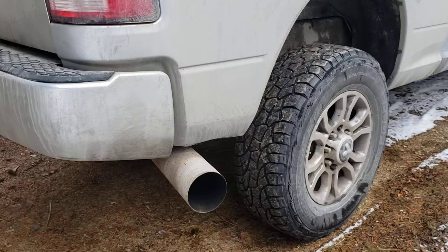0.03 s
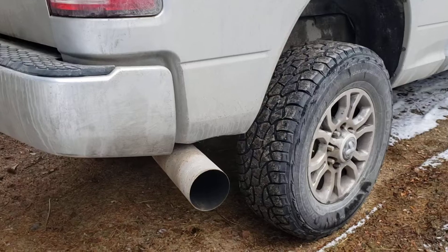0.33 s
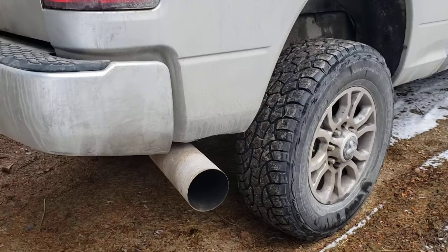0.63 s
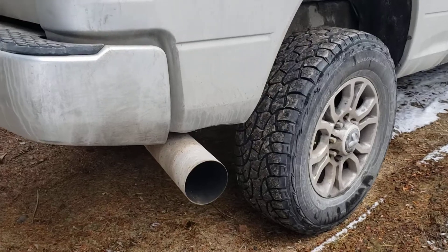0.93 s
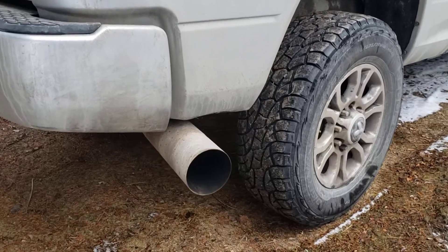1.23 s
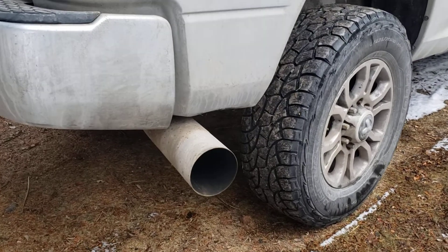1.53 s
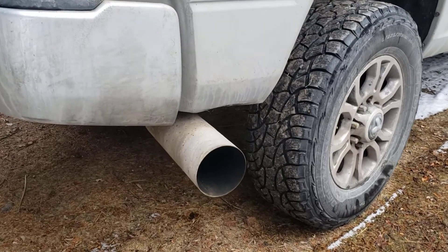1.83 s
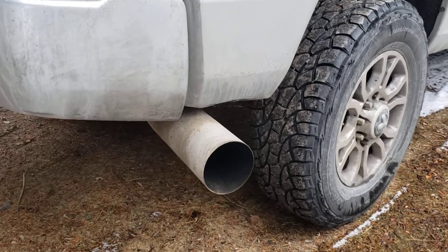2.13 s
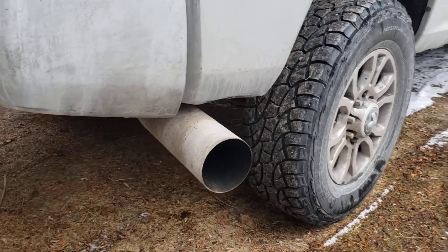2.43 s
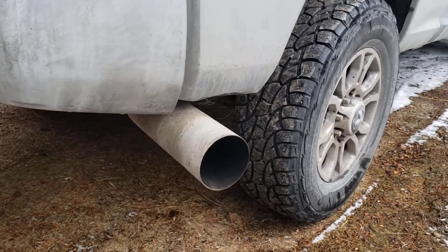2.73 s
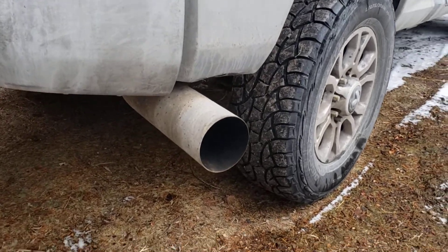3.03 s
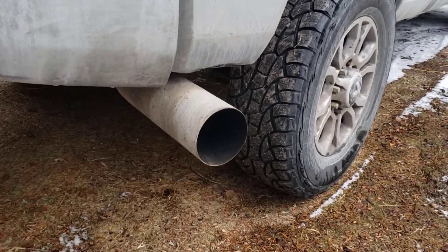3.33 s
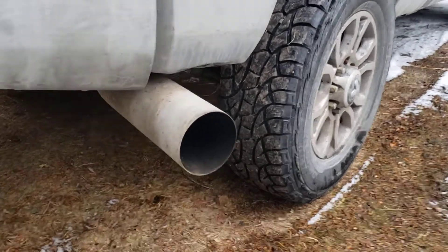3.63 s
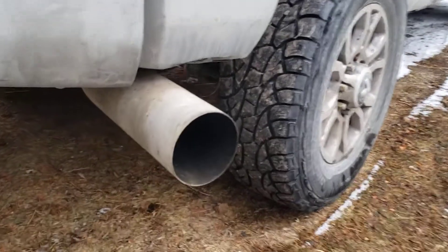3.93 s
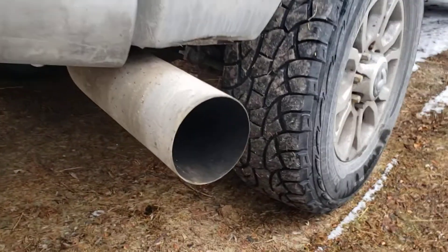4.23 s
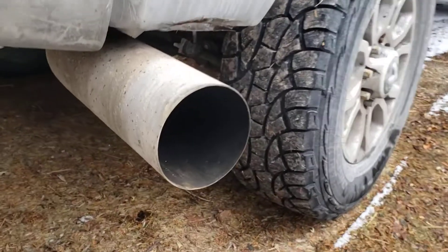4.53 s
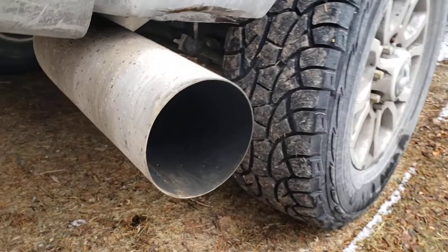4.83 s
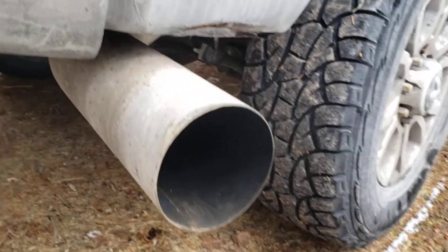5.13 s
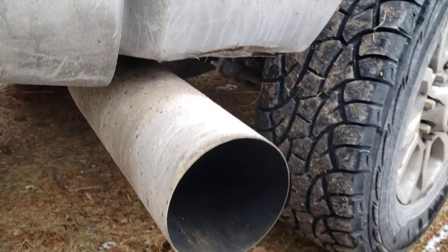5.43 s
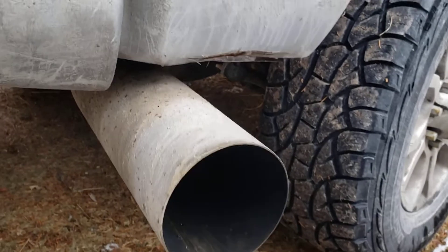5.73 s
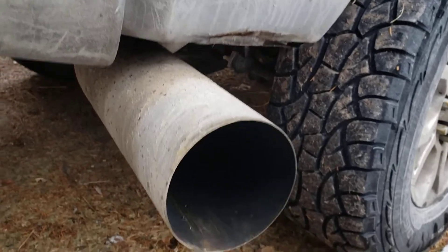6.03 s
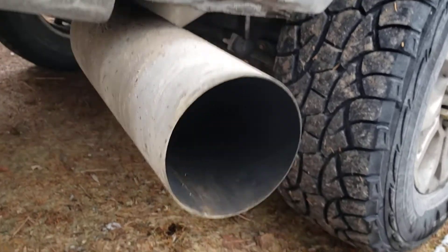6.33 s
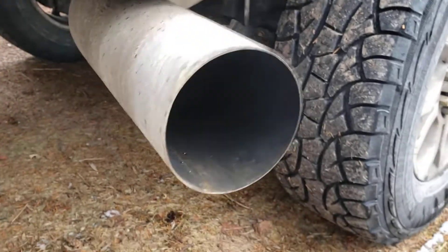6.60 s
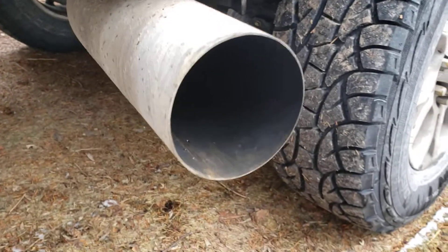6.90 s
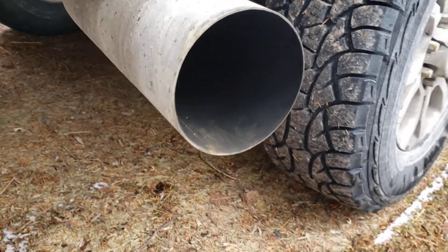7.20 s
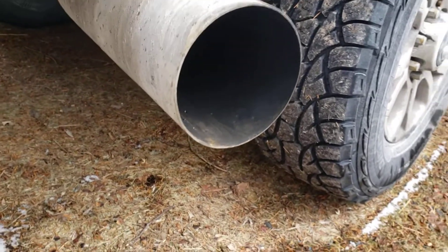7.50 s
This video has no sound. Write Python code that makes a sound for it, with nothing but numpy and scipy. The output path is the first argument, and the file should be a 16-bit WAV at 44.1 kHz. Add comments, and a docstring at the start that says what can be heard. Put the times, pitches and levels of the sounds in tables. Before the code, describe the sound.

A diesel pickup idles outdoors from the start, a deep, even throb of about thirteen puffs a second with light mechanical clatter. From about 1 to 5 seconds, soft footsteps scuff and grit pops as the microphone is carried toward the tailpipe, clearest around 2.5 and 3.6 seconds. The throb grows slightly fuller up close. At 5.4 seconds comes one sharp click, and at 5.5 the exhaust suddenly gushes with a hollow rush, small spurts and low thumps. At about 6.5 seconds the stream hits the microphone hard, the loudest moment, and drowns the idle with buffeting rumble and bright hiss, mostly on the left. From there it settles into a fast pulsing growl and fluttering hiss, with a few brief dips and a hollow howl that drops slightly in pitch near 7 seconds. It keeps blowing until the end, near 7.8 seconds.

```python
"""Walking up to a diesel tailpipe.

Outdoors, a pickup idles, throbbing out of a wide pipe as the microphone is carried up to it over
gritty ground. At close range there is one sharp click and the exhaust suddenly gushes; then the stream
hits the microphone, buffeting it, growling and hissing in fast pulses, mostly on the left."""
import sys
import numpy as np
from scipy import signal
from scipy.fft import rfft, irfft, next_fast_len
from scipy.io import wavfile
from scipy.ndimage import uniform_filter1d, map_coordinates

SR = 44100
rng = np.random.default_rng(int(sys.argv[2]) if len(sys.argv) > 2 else 0)


def dump(signal):
    """Clip the signal to [-1, 1] and save it as 16-bit WAV at the path in sys.argv[1]."""
    limited = np.clip(np.atleast_2d(signal).T, -1, 1)
    pcm = np.round(limited * 32767).astype(np.int16)
    wavfile.write(sys.argv[1], SR, pcm)


N = 342216
T = np.arange(N) / SR
OPEN_S, GUSH_START_S, PULSE_PEAK_S = .1, 5.527, 7.211

# the walk up to the pipe: t/s, throb level/dB, closeness/0-1
APPROACH = [(.1, -24, 0), (1.0, -25, 0.2), (2.2, -23, 0.28), (3.2, -22.5, 0.2), (4.3, -23.5, 0.6),
            (5.0, -25, 0.94), (5.6, -24.5, 0.96)]
# the microphone moves into the stream: t/s, hiss/dB, roar/dB, rumble/dB
STREAM_AT_MIC = [(5.6, -59, -36.5, -36.5), (6.32, -54, -34, -29.5), (6.43, -44.5, -31.5, -23),
                 (6.5, -29.5, -17.5, -17.5), (6.525, -23.5, -23, -21.5), (6.8, -23.5, -24.5, -27),
                 (6.92, -26.5, -32, -30.5), (7.15, -29.5, -36, -28.5), (7.28, -26, -27, -33),
                 (7.44, -31.5, -38.5, -46), (7.62, -26.5, -29, -37.5), (7.76, -31, -41, -46.5)]
# balance of sound arriving through open air: f/Hz, left minus right/dB
AIR_BALANCE = [(400, -0.5), (3300, -0.5), (5500, -0.5), (8300, 32.5), (12000, 3), (15000, 6.5)]
# likeness of left and right, in open air and in the stream: f/Hz, correlation
AIR_LIKENESS = [(150, 0), (400, 0.63), (950, 0), (2400, 0), (15000, 0.15)]
STREAM_LIKENESS = [(60, 0.97), (130, 0.9), (300, 0.77), (550, 0.93), (1000, 0.2), (2300, -0.061),
                   (5000, -0.29), (15000, 0.26)]


def throb(turns, first_s=.1097):
    """Each turn of the idling engine sends one puff ringing through the pipe."""
    pipe_colour = [(34, -45), (52, -0.5), (61, 3), (80, -5), (106, 3), (120, -2), (143, -20.5), (158, -8.5),
                   (185, -23), (206, -17.5), (285, -26), (340, -41.5), (500, -51.5), (900, -83)]  # one throb through the exhaust system: f/Hz, level/dB
    mouth_colour = [(60, 4), (105, 5), (160, 1), (220, 3), (310, -16.5), (370, 7), (520, 4.5)]  # change right at the pipe's mouth: f/Hz, gain/dB
    swamping = [(5.6, 1), (5.9, -2), (6.45, -5.5), (6.7, -20.5)]  # the stream drowns the slow beat: t/s, gain/dB
    train = puffs(turns, first_s, scatter_db=0.7) * (T > OPEN_S)
    far = signal.fftconvolve(train, ring(lambda hz: along(pipe_colour, hz)))[:N]
    near = signal.fftconvolve(far, ring(lambda hz: along(mouth_colour, hz)))[:N]
    approach_db, closeness = curves(APPROACH)
    level_db = approach_db + curves(swamping)[0] + 0.17 * wobble(2.7)
    return unit(far + closeness * (near - far)) * amp(level_db) * amp([[.25], [-.25]])


def jet(settled, flutter, lull_db, flutter_db=3, rise_s=.007):
    """The stream grazes the microphone and hisses: stray spurts at first, then a pulsing blast."""
    hiss_colour = [(880, -33), (1500, -12), (1560, -24), (1740, -49), (1880, -2), (2040, -6), (2450, 4.5),
                   (2990, -7.5), (3330, -6), (3710, -0.5), (5040, -4.5), (7470, -0.5), (8750, -3.5),
                   (15000, 2.5), (15800, -4)]  # gas across the microphone: f/Hz, density/dB
    balance = [(700, -12), (1700, 6), (2700, -3.5), (4000, 4), (5500, 11), (8000, 23), (12000, 5),
               (15500, 11.5)]  # where the hiss sits: f/Hz, left minus right/dB
    stray_spurts = [(5.564, -37, 0.02), (5.727, -37, .014), (5.908, -35.5, 0.018), (6.093, -46, 0.027),
                    (6.237, -44, 0.018)]  # gas brushing the microphone: t/s, level/dB, decay/s
    blast = amp(curves(STREAM_AT_MIC)[0] + flutter_db * settled * flutter - lull_db)
    spurts = sum(amp(db) * np.exp(-np.maximum((s - T) / rise_s, (T - s) / decay))
                 for s, db, decay in stray_spurts)
    return panned(rush(hiss_colour, STREAM_LIKENESS, patchy_db=0), balance) * (blast + spurts)


def buffeting(swing_db=4, drone_db=-26.5, low_cut_hz=42):
    """Eddies rumble on the microphone and blow the pipe's low resonances; slugs of gas thump it."""
    # deep and low-mid eddies on the microphone: f/Hz, density/dB
    rumble_colour = [(24, -50), (34, -20.5), (42, -0.5), (52, 6.5), (66, -4), (90, 2), (200, -50)]
    roar_colour = [(120, -12.5), (155, 2.5), (250, -7), (400, -7), (540, -17.5), (700, -16), (1500, -55.5)]
    # the pipe's main and upper resonances: f/Hz, width/Hz, level/dB
    main_modes = [(80.1, 22, 2.5), (113.4, 14, 1.5)]
    upper_modes = [(147.6, 22, 4), (180.9, 20, 1.5), (284.4, 24, 1.5), (310, 16, -1), (347.6, 20, -5),
                   (414, 40, -10.5)]
    slugs = [(5.695, -19, 487, 0.058), (5.731, -17, 147, 0.096), (5.919, -11.5, 102.8, 0.55),
             (6.193, -8, 83.5, 0.06), (6.47, -3, 61, 0.066), (6.472, -9.5, 388, 0.033),
             (6.51, -12, 485, 0.035)]  # gas striking the microphone: t/s, level/dB, f/Hz, t60/s
    _, roar_db, rumble_db = curves(STREAM_AT_MIC)
    rumble = amp(rumble_db + swing_db * wobble(14)) * rush(rumble_colour, STREAM_LIKENESS, patchy_db=.5)
    drone = resonances(main_modes, 1 + 0.019 * wobble(12))
    drone = unit(drone / np.sqrt(np.abs(signal.hilbert(drone)) + 0.17))  # losses cap its swing
    drone *= amp(drone_db) * np.interp(T, [5.6, 5.95], [.2, 1])
    eddies = amp(-3) * rush(roar_colour, STREAM_LIKENESS, patchy_db=3.5)
    body = amp(-5) * resonances(upper_modes, 1 + 0.01222 * wobble(12))
    roar = amp(roar_db + wobble(45)) * (eddies + body)
    thumps, t = np.zeros(N), np.arange(SR // 4) / SR
    for s, db, hz, t60 in slugs:
        add(thumps, s, -amp(db - 60 * t / t60) * np.sin(2 * np.pi * hz * t))
    low_cut = signal.cheby1(N=4, rp=1, Wn=low_cut_hz, btype="high", fs=SR, output="sos")
    thumps = signal.sosfilt(low_cut, thumps)
    return (rumble + drone + thumps) * amp([[.3], [-.3]]) + roar * amp([[.8], [-.8]])


def growl(beats, settled, level_db=-25, lead_s=0.0041):
    """Each fast pulse of the stream rings the pipe, merging into a pitched growl."""
    pulse_colour = [(25, -64), (42, -32.5), (77, -1.5), (98, -3), (116, 3), (145, -7), (185, -14),
                    (250, -17.5), (320, -19), (420, -23), (600, -41), (1200, -69)]  # one pulse in the pipe: f/Hz, level/dB
    train = puffs(beats, PULSE_PEAK_S - lead_s, scatter_db=1.8)
    sound = unit(signal.fftconvolve(train, ring(lambda hz: along(pulse_colour, hz)))[:N])
    return amp(level_db) * settled * sound * amp([[.4], [-.4]])


def gush(settled, flutter, lull_db, base_db=-35, surge_s=0.03, drift_share=.035):
    """Turbulent gas surges from the pipe; hollow bands drift about and fade as the stream settles."""
    gas_colour = [(160, -21.5), (290, -7), (386, -19), (500, -4.5), (660, -11.5), (810, -6.5), (1100, -8),
                  (1400, -13), (1640, -12), (2300, -13.5), (2950, -10.5), (3400, -19.5), (4430, -24.5),
                  (15800, -44)]  # turbulence at the mouth: f/Hz, density/dB
    hollow_bands = [(811, 60, -1.5), (1120, 90, 0), (1618, 70, -5), (2106, 130, -15)]  # resonances in the gush: f/Hz, width/Hz, level/dB
    balance = [(400, 1), (2000, 3.5), (3300, -1), (5500, 3.5), (8300, 36), (12000, 15), (15000, -1.5)]  # where the gush sits: f/Hz, left minus right/dB
    broad = rush(gas_colour, STREAM_LIKENESS, patchy_db=3.5)
    pitch = 1 + (1 - settled) * drift_share * wobble(24) + .012 * wobble(19)
    hollow = np.array([resonances(hollow_bands, pitch) for _ in range(2)]) * amp(-1 - 6 * settled)
    surge_db = 5.5 * np.exp(-((T - GUSH_START_S - surge_s) / surge_s) ** 2)
    level_db = base_db + surge_db + settled * (0.5 * flutter - 2.5) - 0.54 * lull_db
    return panned(broad + hollow, balance) * amp(level_db)


def lulls(snap_s=.008):
    """Loss of the stream in dB: it sags away gradually, then snaps back."""
    sags = [(5.9, 0.09, 8.5), (6.062, 0.067, 6), (6.195, .065, 9), (6.692, 0.051, 28.5), (6.891, 0.096, 12),
            (7.025, 0.043, 16.5), (7.206, 0.04, 9.5)]  # dips in the stream: return t/s, length/s, nominal depth/dB
    shape = [0.00045, 0.92, 0.67, 0.0055]
    return sum(db * np.interp(T, [s - length, s - length / 3, s - snap_s / 2, s + snap_s / 2], shape)
               for s, length, db in sags)


def singing(lines_db=-41, howl_width_hz=6.73):
    """The stream keeps narrow pipe resonances sounding, and a howl at the rim that drops in pitch."""
    narrow_modes = [(219.4, 9, 7), (274.4, 7.1, 2), (808, 22, -0.5), (1623, 16, -11)]  # pipe resonances: f/Hz, width/Hz, level/dB
    firmness = [(5.8, 0.31), (6.45, 0.66), (6.6, 0.62), (7.76, 1.8)]  # how firmly they sound: t/s, gain
    rim_howl = [(6.45, 342, -68), (6.58, 343, -31), (6.8, 345, -39), (6.95, 315, -37.5), (7.15, 315, -49),
                (7.3, 316, -35.5), (7.76, 318, -39)]  # gas across the rim: t/s, f/Hz, level/dB
    lines = amp(lines_db) * curves(firmness)[0] * resonances(narrow_modes, 1 + 0.00426 * wobble(7.3))
    howl_hz, howl_db = curves(rim_howl)
    phase = 2 * np.pi * np.cumsum(howl_hz + howl_width_hz / 2 * wobble(20)) / SR
    return lines + amp(howl_db + 2.3 * wobble(12)) * unit(np.sin(phase))


def clatter(turns, swell_db=2.5, lag_turns=0.26):
    """Mechanical noise and gas hiss from under the truck swell shortly after every puff."""
    levels = [(.5, -54.5), (2.0, -53), (3.0, -50.5), (4.1, -49.5), (5.2, -53)]  # clatter along the walk: t/s, level/dB
    engine_colour = [(250, -6), (380, -6.5), (480, -18), (620, -16.5), (820, -17), (1020, -24.5),
                     (1450, -29.5), (1810, -22), (2300, -33.5), (3100, -32.5), (4200, -34.5), (5400, -40),
                     (7500, -40), (9000, -41.5), (15800, -36)]  # engine noise: f/Hz, density/dB
    bodywork = [(300, -4), (480, 6), (700, -3), (2000, 2.5), (3000, -2), (4200, 2), (12000, 1)]  # its shading with the microphone low by the pipe: f/Hz, gain/dB
    swell = np.cos(2 * np.pi * (turns - np.interp(.107, T, turns) - lag_turns))
    level_db = curves(levels)[0] + swell_db * swell + wobble(150) + 1.4 * wobble(6.6)
    sound = panned(rush(engine_colour, AIR_LIKENESS, patchy_db=3), AIR_BALANCE) * amp(level_db)
    shaded = filtered(sound, lambda hz: amp(along(bodywork, hz)))
    closeness = curves(APPROACH)[1]
    return sound + closeness ** 2 * (shaded - sound)


def grit_and_click():
    """Grit pops underfoot on the way in; apart from it, one sharp click comes just before the gush."""
    # the grit, then the click in the last row: t/s, level/dB, relative knock/dB, treble/dB, tail/dB
    onsets = [(1.338, -41, -7.5, -20, -10), (1.398, -38, 4, -43, -36), (1.561, -36, -8.5, -52, -14),
              (1.645, -54, -11, -20.5, -11), (1.821, -38, -13.5, -26, -17), (2.426, -27.5, -12, -7.5, 1),
              (2.46, -28.5, -1.5, -18, -16.5), (2.496, -34.5, -6, -6.5, -14),
              (3.266, -44, -19, -34.5, -14.5), (3.504, -33.5, -6, -40, -14.5),
              (3.558, -36.5, -3.5, -34.5, -19.5), (3.583, -25.5, -16.5, -14.5, -21),
              (3.643, -37.5, -18, -37, -10), (3.756, -46.5, -16, -31.5, -10), (3.965, -30.5, -22, -30, -8),
              (4.028, -39.5, -2.5, -30, -26), (4.047, -40.5, -10.5, -42, -25.5),
              (4.165, -30, -10.5, -40.5, -18), (4.199, -41, -13, -24, -13), (4.568, -34, -11, -35, -25.5),
              (4.595, -40.5, -14, -26, -17), (4.76, -46.5, -18, -33, -29), (5.421, -22, -12.5, -7, -35.5)]
    grit, click = onsets[:-1], onsets[-1:]
    return snaps(grit) + snaps(click)


def snaps(rows, tail_t60=0.024, gain_db=6.5):
    """One snap per row, with a dull knock and a short noisy tail."""
    # the snap and its knock: f/Hz, level/dB
    snap_colour = [(200, -26), (1050, 2.5), (1700, -6.5), (4000, -17), (15000, -46)]
    knock_colour = [(150, -8.5), (400, 22), (750, 15.5), (1500, -12), (5000, -41.5)]
    track, t = np.zeros((2, N)), np.arange(2048) / SR
    for s, db, knock_db, treble_db, tail_db in rows:
        def colour_db(hz):
            knock = amp(knock_db + along(knock_colour, hz))
            treble = amp(treble_db - 6) * hz / (hz + 1500)
            return 20 * np.log10(amp(along(snap_colour, hz)) + knock + treble)
        burst = amp(tail_db - 60 * t / tail_t60) * rng.standard_normal((2, len(t)))
        burst[:, 0] = 1  # the sharp onset
        snap = signal.fftconvolve(ring(colour_db, size=2048)[None], burst, axes=1)
        for channel, sound in zip(track, snap / np.abs(snap).max()):
            add(channel, s + 0.0011, amp(db + gain_db) * sound)
    return track


def scuffs():
    """Soles scrape the ground below the microphone and drag hissing sand."""
    steps = [(0.804, 0.054, -65, 3), (1.504, .008, -73, 10.5), (1.625, 0.036, -71, -3),
             (2.326, 0.044, -48.5, -14), (2.445, 0.02, -41, -12.5), (2.507, 0.028, -46, -13.5),
             (2.588, 0.088, -60.5, -19), (3.161, 0.091, -61, -12.5), (3.523, 0.01, -54.5, -17.5),
             (3.983, 0.026, -57.5, -16), (4.172, 0.008, -44, -16), (4.57, 0.049, -54, -12)]  # sole strokes: t/s, half-width/s, level/dB, relative sand/dB
    # the ground and the sand under a sole: f/Hz, density/dB
    ground_colour = [(250, -30.5), (420, -9), (650, -4.5), (800, 3.5), (930, -2.5), (1300, -2), (1900, -8),
                     (2800, -11), (4000, -26), (6000, -39), (12000, -54)]
    sand_colour = [(1500, -19.5), (3800, 1), (7000, -2), (15000, -5)]
    scrape_gain, sand_gain = np.zeros((2, N))
    for s, width, db, sand_db in steps:
        stroke = amp(db) * np.exp(-.5 * ((T - s) / width) ** 2)
        scrape_gain += stroke
        sand_gain += stroke * amp(sand_db)
    scrape = scrape_gain * rush(ground_colour, AIR_LIKENESS, patchy_db=2.5)
    sand = sand_gain * rush(sand_colour, AIR_LIKENESS, patchy_db=3)
    return (scrape + sand) * unit(amp(2.8 * wobble(250)))


def grains(count=30, from_s=.6, to_s=5.5, peak_db=-55, spread_db=0.5):
    """Single grains shift underfoot, ticking at random between the louder pops."""
    tick_colour = [(300, -15), (900, 0), (3000, -5.5), (7000, -9.5), (15000, -13.5)]  # one grain: f/Hz, level/dB
    tick = ring(lambda hz: along(tick_colour, hz), size=1024)
    track = np.zeros(N)
    for s, chance in zip(rng.uniform(from_s, to_s, count), rng.standard_normal(count)):
        add(track, s, amp(peak_db + spread_db * chance) * tick / np.abs(tick).max())
    return track


def hum():
    """A faint hum swells briefly in the background."""
    swell = (4.27, .13, 790, -60)  # one tone: t/s, half-width/s, f/Hz, level/dB
    s, width, hz, db = swell
    return amp(db) * np.exp(-.5 * ((T - s) / width) ** 2) * np.sin(2 * np.pi * hz * T)


def puffs(turns, anchor_s, scatter_db):
    """One impulse per turn, in step with anchor_s, each a little different in strength."""
    phase = np.interp(anchor_s, T, turns) % 1
    starts = np.interp(np.arange(phase, turns[-1], 1), turns, T)
    train = np.zeros(N)
    for s, chance in zip(starts, rng.standard_normal(512)):
        add(train, s, np.array([-amp(scatter_db * chance)]))
    return train


def resonances(modes, pitch):
    """Narrow bands blown by turbulence, all scaled by a pitch factor; rms 1."""
    clock = np.cumsum(pitch) / SR
    bands = (amp(db) * (wobble(width) + 1j * wobble(width)) * np.exp(2j * np.pi * hz * clock)
             for hz, width, db in modes)
    return unit(sum(bands).real)


def rush(colour, likeness, patchy_db):
    """Stereo noise with patches of random gain in time and frequency; its mid has rms 1."""
    spectra = signal.stft(rng.standard_normal((2, N)), nperseg=1024)[2]
    patches = uniform_filter1d(rng.standard_normal(spectra.shape[1:]), size=5, axis=0)
    patches = uniform_filter1d(patches, size=6, axis=1)
    pair = signal.istft(spectra * amp(patchy_db * unit(patches)), nperseg=1024)[1][:, :N]
    def gains(hz):
        angle = np.arccos(np.clip(along(likeness, hz), -.9, 1)) / 2
        return amp(along(colour, hz)) * np.array([np.ones_like(hz), np.tan(angle)])
    mid, side = filtered(pair, gains)
    return np.array([mid + side, mid - side]) / np.std(mid)


def panned(x, balance):
    """Spread left and right with a level difference for each frequency."""
    def gains(hz):
        pair = amp(np.outer([.5, -.5], along(balance, hz)))
        return pair / np.sqrt(np.mean(pair ** 2, axis=0))
    return filtered(x, gains)


def ring(gain_db, size=16384):
    """The causal impulse response that has a given dB colour."""
    cepstrum = irfft(np.log(amp(gain_db(np.fft.rfftfreq(size, 1 / SR))) + 1e-6))
    cepstrum[1:size // 2] *= 2
    cepstrum[size // 2 + 1:] = 0
    return irfft(np.exp(rfft(cepstrum)))


def filtered(x, response):
    """x through a gain that depends on frequency."""
    size = next_fast_len(N + SR // 2)
    return irfft(rfft(x, size) * response(np.fft.rfftfreq(size, 1 / SR)), size)[..., :N]


def wobble(rate):
    """A smooth random curve, rate knots a second."""
    return map_coordinates(rng.standard_normal(int(N * rate / SR) + 4), [T * rate])


def curves(rows):
    """One value per sample for each column after the time."""
    s, *columns = np.transpose(rows)
    return [np.interp(T, s, column) for column in columns]


def along(points, hz):
    """(Hz, value) points read on a log axis."""
    knots_hz, values = np.transpose(points)
    return np.interp(np.log(hz + 1), np.log(knots_hz + 1), values)


def add(track, s, sound):
    """Mix a short sound into a track at time s."""
    part = track[max(round(s * SR), 0):][:len(sound)]
    part += sound[:len(part)]


def amp(db):
    """Decibels to gain."""
    return 10 ** (np.asarray(db) / 20)


def unit(x):
    """Scale to rms 1."""
    return x / np.sqrt(np.mean(x ** 2) + 1e-20)


def scene():
    """Idle and footsteps on the way in; at the pipe the stream sets in, then settles into pulsing."""
    idle_rate = [(0.1, 12.86), (0.65, 13.29), (1.7, 12.71), (2.6, 13.26), (3.05, 13.02), (3.85, 13.39),
                 (4.25, 13.17), (5.3, 13.42), (5.9, 12.95)]  # engine throbs: t/s, rate/Hz
    pulse_rate = [(6.5, 25), (6.63, 34), (6.9, 36), (7.05, 33), (7.2, 32.5), (7.32, 39), (7.47, 34.5),
                  (7.62, 37.5)]  # pulses of the stream: t/s, rate/Hz
    turns = np.cumsum(curves(idle_rate)[0]) / SR + 0.301 * (T > 5.4)  # one throb comes early
    beats = np.cumsum(curves(pulse_rate)[0]) / SR
    flutter = np.cos(2 * np.pi * (beats - np.interp(PULSE_PEAK_S, T, beats)))
    blowing = np.clip((T - GUSH_START_S) / 0.025, 0, 1) ** 2
    settled = np.interp(T, [6.4, 6.6], [0, 1])
    lull_db = lulls()
    stream = gush(settled, flutter, lull_db) + jet(settled, flutter, lull_db)
    stream += growl(beats, settled) + buffeting() + singing()
    engine = throb(turns) + clatter(turns)
    background = panned(grit_and_click() + scuffs() + grains() + hum(), AIR_BALANCE)
    return engine + blowing * stream + background


def record(dry):
    """The microphone channel opens after a moment and passes nothing above 16 kHz."""
    fade_in = np.clip((T - OPEN_S) / 0.0065, 0, 1)
    return filtered(dry * fade_in, lambda hz: hz < 16000)


dry = scene()
out = record(dry)
dump(out)
```